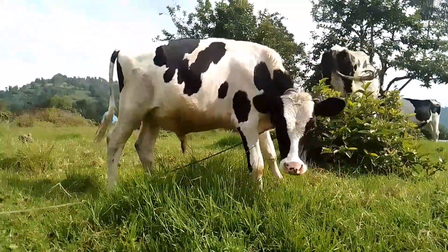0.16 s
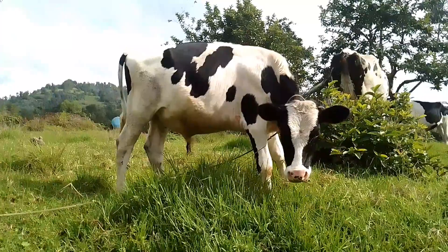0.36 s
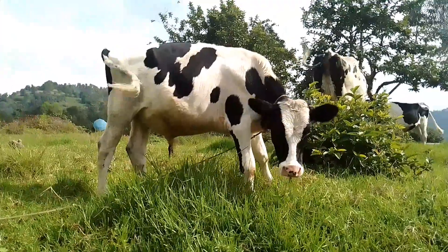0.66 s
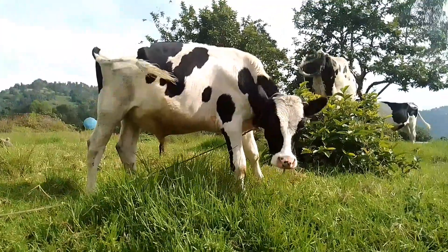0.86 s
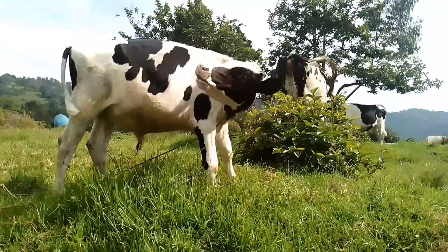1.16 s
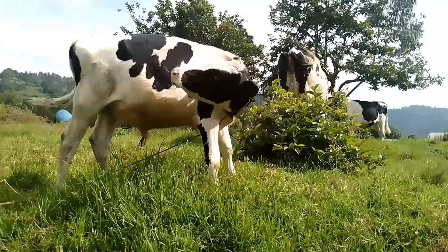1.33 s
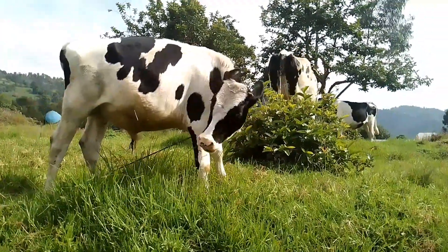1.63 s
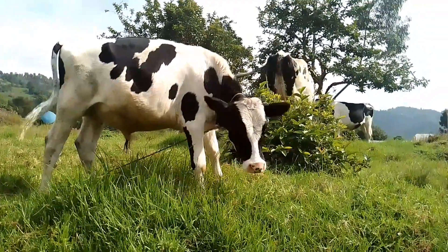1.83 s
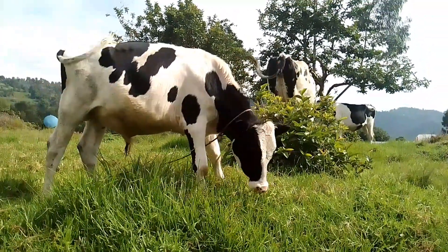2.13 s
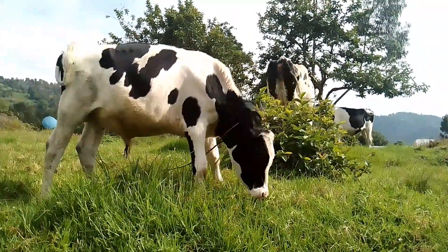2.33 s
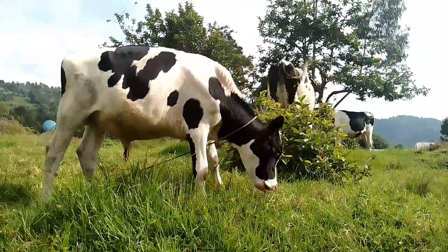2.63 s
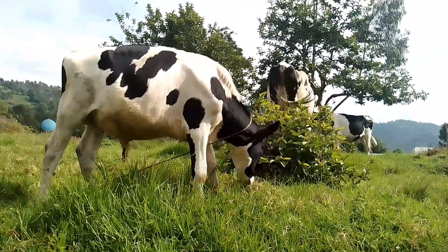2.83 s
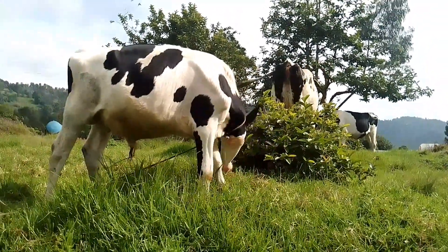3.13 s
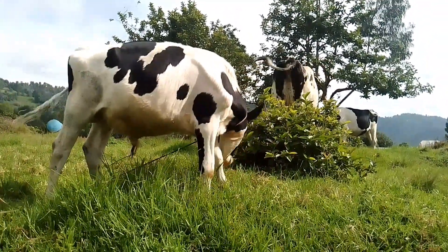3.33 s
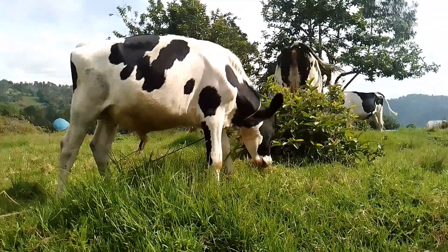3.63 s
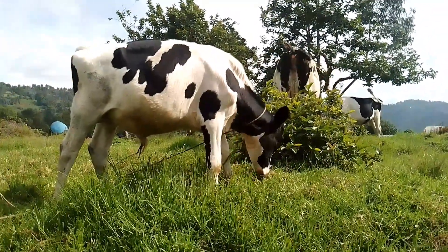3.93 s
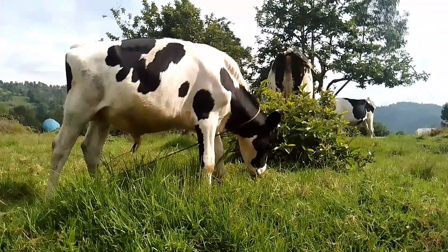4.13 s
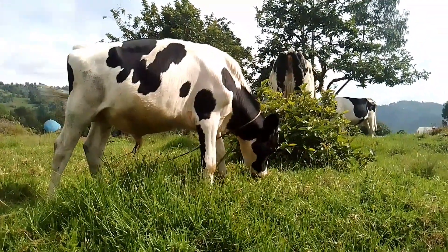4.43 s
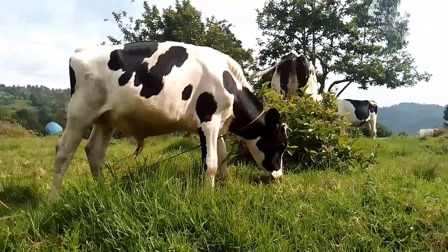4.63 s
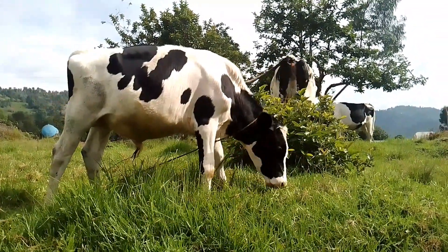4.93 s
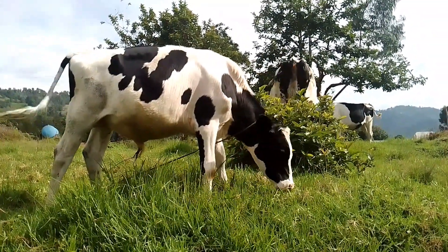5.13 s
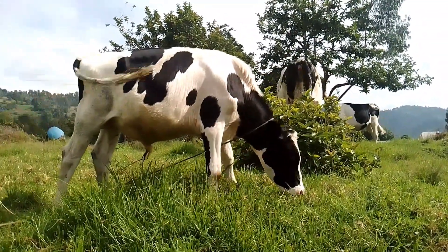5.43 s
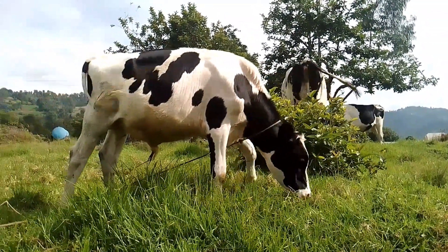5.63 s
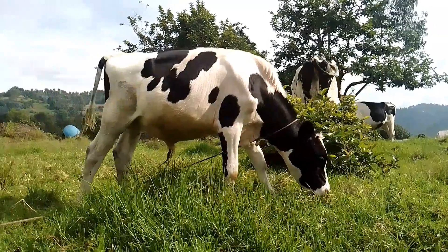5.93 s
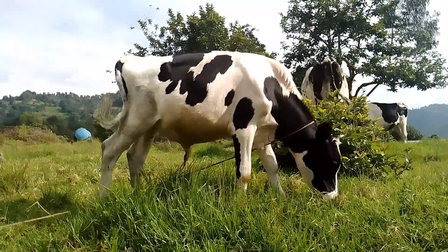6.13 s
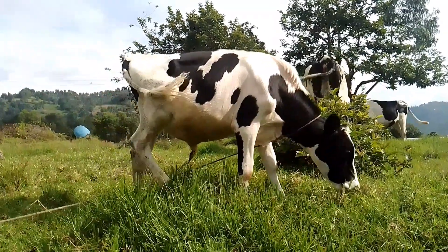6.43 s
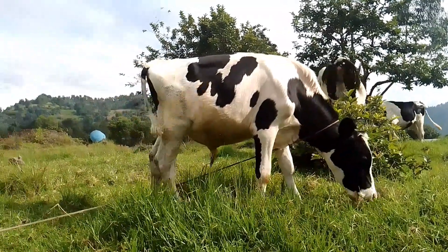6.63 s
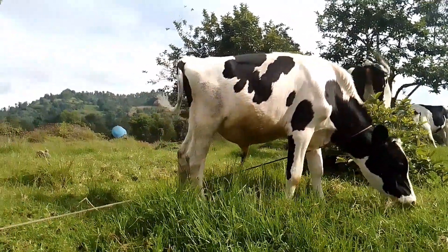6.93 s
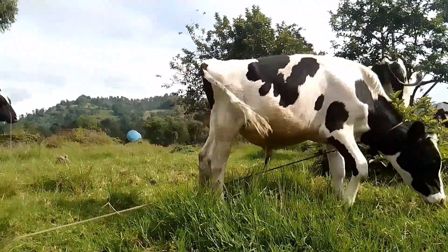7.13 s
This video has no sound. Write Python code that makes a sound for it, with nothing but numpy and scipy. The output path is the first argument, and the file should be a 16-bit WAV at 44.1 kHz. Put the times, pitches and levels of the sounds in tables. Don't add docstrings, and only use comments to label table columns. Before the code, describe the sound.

Close grass tearing and crisp snapping from a grazing cow, soft turf thuds, and high pulsed bird trills in a quiet open pasture.

```python
import sys
import numpy as np
from scipy import signal
from scipy.io import wavfile
from scipy.ndimage import uniform_filter1d

SR = 44100
rng = np.random.default_rng(int(sys.argv[2]) if len(sys.argv) > 2 else 0)


def voltage_ratio(level):
    return 10 ** (np.asarray(level, float) / 20)


def generate_wav(signal):
    frames = np.transpose(np.atleast_2d(signal))
    scaled = np.clip(frames, -1, 1) * 32767
    pcm = np.round(scaled).astype(np.int16)
    wavfile.write(sys.argv[1], SR, pcm)


N = 320166

# (centre [Hz], width [Hz], level [dB])
BRIGHT = [(6900, 2630, 6.5), (8760, 1770, 10), (9360, 230, 1.5)]
# (centre [Hz], width [Hz], level [dB])
DULL = [(3200, 1440, 0.5), (1060, 400, -2)]


def rms_one(x):
    return x / np.sqrt(np.mean(x ** 2) + 1e-20)


def in_time(rows):
    s, *columns = np.transpose(rows)
    return [np.interp(np.arange(N) / SR, s, column) for column in columns]


def add(out, s, piece):
    i = max(round(s * SR), 0)
    out[i:i + len(piece)] += piece[:N - i]


def above(x, hz, order):
    return signal.sosfilt(signal.butter(order, hz, "high", fs=SR, output="sos"), x)


def tone(pitch_hz):
    return np.sin(2 * np.pi * np.cumsum(pitch_hz) / SR)


def progress(length_s):
    return np.arange(round(length_s * SR)) / (length_s * SR)


def drift(rate_hz):
    r = np.exp(-80 * np.pi * rate_hz / SR)
    slow = signal.lfilter([1], [1, -2 * r, r * r], rng.standard_normal(N // 40 + 2002))
    slow = rms_one(slow[2000:])
    return np.interp(np.arange(N) / 40, np.arange(len(slow)), slow)


def resonate(x, modes):
    out = 0
    for k, (hz, width_hz, db) in enumerate(modes):
        r = np.exp(-np.pi * width_hz / SR)
        b = (1 - r * r) / 2 * np.array([1, 0, -1])
        a = [1, -2 * r * np.cos(2 * np.pi * hz / SR), r * r]
        out = out + (-1) ** k * voltage_ratio(db) * signal.lfilter(b, a, x)
    return out


def swells(rows, rest_db):
    lean = 0.64
    power = np.full(N, voltage_ratio(2 * rest_db))
    coarse_s = np.arange(N // 64 + 2) * 64 / SR
    for s, length, db in rows:
        w = np.clip((coarse_s - s) / length, 0, 1)
        power += voltage_ratio(2 * db) * np.repeat(np.sin(np.pi * w ** lean) ** 2, 64)[:N]
    return 10 * np.log10(power)


def grains(per_s, spread_db, clumps):
    born = rng.random(N) < per_s * clumps / SR
    size = voltage_ratio(spread_db * np.minimum(rng.exponential(1, N), 5))
    return born * size * rng.choice([-1, 1], N) + 1e-18


def splinters(count, spread_ms, share, rise_ms=0.):
    t_ms = np.arange(count) / SR * 1000
    present = rng.random(count) < .3
    burst = share * rng.standard_normal(count) * present * np.exp(-t_ms / max(spread_ms, .1))
    if rise_ms > 0:
        return 2 * burst * (1 - np.exp(-(t_ms / rise_ms) ** 2))
    burst[0] = 1
    return burst


def scatter(x, t60):
    t = np.arange(round(.25 * SR)) / SR
    echoes = rng.standard_normal(len(t)) * voltage_ratio(-60 * t / t60) * (t > .002)
    return signal.fftconvolve(x, echoes / np.sqrt(np.sum(echoes ** 2)))[:N]


def banded_noise(spectrum, patchy_db):
    out = 0
    edges = 25 * 2 ** np.arange(0, 9.6, 1 / 4)
    white = rng.standard_normal((2, N))
    hz_at, db_at = np.transpose(spectrum)
    for k, (low, high) in enumerate(zip(edges, edges[1:])):
        band = signal.sosfilt(signal.butter(2, [low, high], "band", fs=SR, output="sos"), white[k % 2])
        flicker_db = patchy_db * drift(17.4) / (1 + low / 5000)
        band_db = np.interp(np.log(low * high) / 2, np.log(hz_at), db_at)
        out = out + band * voltage_ratio(band_db + flicker_db)
    return rms_one(out)


def open_air():
    # (frequency [Hz], density [dB per Hz])
    air_colour = [(18, -48), (30, -25), (97, -10.5), (316, -2.5), (1050, -8.5), (1270, -8.5), (2190, -11),
                  (3000, -6), (4560, -25), (4930, -27.5), (6080, 5), (7300, -3), (9740, -3.5), (11400, -44),
                  (15600, -8.5)]
    return voltage_ratio(-62.5) * banded_noise(air_colour, patchy_db=4.0)


def insects(level_db, hz, width_hz):
    edge = signal.butter(2, width_hz, fs=SR, output="sos")
    a, b = signal.sosfilt(edge, rng.standard_normal((2, N)))
    phase = 2 * np.pi * np.cumsum(hz) / SR
    return voltage_ratio(level_db - 1.0) * rms_one(a * np.cos(phase) + b * np.sin(phase))


def insect_chorus():
    # (time [s], level [dB], pitch [Hz])
    broad = [
        (0.0, -56.5, 9510),
        (2.22, -59.5, 9970),
        (2.51, -57.5, 9830),
        (3.28, -61, 9770),
        (3.92, -57.5, 9710),
        (5.26, -59.5, 9840),
        (6.73, -53, 9830),
        (7.26, -59, 9800),
    ]
    # (time [s], level [dB], pitch [Hz])
    thin = [(0, -67, 10400), (.9, -65, 10000), (1.15, -74, 10800), (1.75, -70, 11000), (2.1, -92, 10100),
            (2.6, -77, 10200), (3.0, -71, 10900), (3.45, -71, 10900), (3.7, -69, 10300), (5.0, -69, 10380),
            (7.26, -70, 10550)]
    return insects(*in_time(broad), width_hz=420) + insects(*in_time(thin), width_hz=64)


def rustle(dry_db, top_db, tear_db):
    clumps = voltage_ratio(4.0 * drift(18))
    fine = rms_one(grains(2500, spread_db=1.0, clumps=clumps)) + 0.41 * rng.standard_normal(N)
    coarse = rms_one(grains(500, spread_db=1.5, clumps=clumps)) + 1.43 * rng.standard_normal(N)
    top = above(fine, 11000, order=3)
    bright = above(resonate(fine, BRIGHT), 5800, order=3)
    dull = resonate(resonate(coarse, DULL), [(2680, 16300, 0)])
    out = voltage_ratio(dry_db + 2.0) * rms_one(bright)
    out += voltage_ratio(top_db + 11.5) * rms_one(top)
    return out + voltage_ratio(tear_db + 5.0) * rms_one(dull)


def grazing():
    # (start [s], length [s], dry rustle [dB], juicy tearing re rustle [dB])
    tugs = [(-.3, 0.8, -53, -6.5), (0.31, 0.66, -70.5, -2), (0.743, 0.21, -66, -3), (1.013, 0.12, -56, -12),
            (1.15, 0.6, -63.5, -5), (1.648, 0.14, -58.5, -11.5), (1.856, 0.06, -68, -22),
            (2.44, 0.22, -61, -20), (2.914, 0.44, -60, -11), (3.44, 0.26, -59.5, -27),
            (3.832, 0.42, -59, -13.5), (4.148, 0.43, -67.5, -0.5), (4.494, 0.58, -56.5, -16.5),
            (4.623, 0.13, -56, -10), (5.273, 0.87, -59, -13), (5.732, 0.5, -50.5, -18.5),
            (6.185, 0.34, -58, -11.5), (6.335, 0.25, -51, -16.5), (6.515, 0.57, -51.5, -12),
            (6.946, 0.97, -55, -15.5), (7.014, 0.11, -50, -17)]
    # (start [s], length [s], fizz [dB])
    swishes = [
        (-.12, 0.45, -65),
        (4.64, 0.091, -59.5),
    ]
    rest_db, juicy_rest_db, fizz_rel_db = -63, -74.5, -18.5
    dry_db = swells([row[:3] for row in tugs], rest_db)
    fizz_rows = [(s, length, db + fizz_rel_db) for s, length, db, _ in tugs]
    fizz_db = swells(fizz_rows + swishes, rest_db + fizz_rel_db)
    juicy_db = swells([(s, length, db + rel_db) for s, length, db, rel_db in tugs], juicy_rest_db)
    return rustle(dry_db, fizz_db, juicy_db)


def chewing(body_db):
    clicks = grains(120, spread_db=0.5, clumps=voltage_ratio(7.6 * drift(9.7)))
    dealt = rng.integers(0, 8, N)
    rings = 0
    for k, hz in enumerate(np.geomspace(600, 2600, 8)):
        rings = rings + resonate(clicks * (dealt == k) + 1e-18, [(hz, 0.53 * hz, 0)])
    return voltage_ratio(body_db - 9.5) * rms_one(rings)


def body():
    # (start [s], length [s], level [dB])
    shifts = [
        (-.15, 0.88, -64),
        (1.25, 0.31, -64),
        (1.53, 0.36, -65.5),
        (2.98, 0.42, -66),
        (3.88, 0.15, -64),
        (4.64, 0.31, -65),
        (5.03, 0.19, -67.5),
        (5.45, 0.15, -63),
        (6.13, 0.42, -67),
        (7.04, 0.054, -71),
    ]
    # (frequency [Hz], density [dB per Hz])
    turf_colour = [(40, -20), (100, -10), (250, -3), (500, -5), (1000, -11), (2000, -12), (3000, -38)]
    body_db = swells(shifts, rest_db=-68)
    return voltage_ratio(body_db - 2.0) * banded_noise(turf_colour, patchy_db=2.5) + chewing(body_db)


def cracks(rows, length_ms, width, lag_s=0.00088, rise_ms=0.):
    # (frequency [share of its pitch], level [dB])
    mouth = [(1.012, 10), (1.4, -5.5), (0.87, 1)]
    out = np.zeros(N)
    for s, db, hz in rows:
        spread_ms = length_ms * (3300 / hz) ** .7
        burst = splinters(count=1500, spread_ms=spread_ms, share=0.92, rise_ms=rise_ms)
        ring = resonate(burst, [(share * hz, width * hz, rel_db) for share, rel_db in mouth])
        add(out, s + lag_s, voltage_ratio(db - 3.0) * ring / np.max(np.abs(ring)))
    return out


def mouth_and_turf():
    # (time [s], peak [dB], pitch [Hz])
    wet = [(0.062, -52, 3970), (0.134, -44.5, 960), (0.258, -38, 2740), (0.752, -43.5, 1240),
           (0.752, -49, 2400), (2.258, -50, 2000), (3.183, -49, 3250), (3.183, -50, 1790),
           (1.002, -41, 3350), (1.586, -39, 3020), (2.475, -44, 2730), (3.754, -51, 1870),
           (3.813, -46, 1760), (4.003, -46, 3350), (4.465, -46.5, 1610), (4.479, -43, 2770),
           (4.67, -38.5, 3250), (5.056, -46.5, 1900), (5.075, -45.5, 3160), (5.833, -36.5, 3650),
           (6.368, -36.5, 3560), (6.423, -44, 3630), (6.45, -34, 3000), (6.451, -59, 610),
           (7.041, -38, 3170), (7.074, -40, 2570), (7.0735, -41.5, 1290), (7.071, -46, 3600)]
    # (time [s], peak [dB], pitch [Hz])
    smacks = [(0.064, -46, 4000), (0.075, -49, 3610), (0.097, -53, 3700), (0.124, -56, 970),
              (0.167, -37, 3500), (0.199, -48, 3390), (0.372, -49, 2380), (0.518, -50, 3550),
              (0.646, -47.5, 1150), (0.777, -57, 810), (0.815, -53, 620), (0.84, -49, 1290),
              (0.874, -43.5, 3130), (0.979, -57, 3360), (1.056, -45, 3220), (1.166, -52, 3350),
              (1.218, -44, 3100), (2.964, -46, 2980), (3.091, -54, 1230), (3.715, -46, 2870),
              (3.903, -48, 1690), (3.93, -58, 1730), (3.97, -52, 1660), (4.01, -43, 3250),
              (4.189, -51, 743), (4.369, -54, 3070), (4.742, -59, 790), (4.862, -47, 2340),
              (6.086, -48, 3740), (6.717, -47, 3460)]
    # (time [s], peak [dB], pitch [Hz])
    sharp = [(0.4205, -24, 2940), (1.612, -48, 1050), (1.68, -61, 1200), (3.464, -34, 3670),
             (6.4505, -34, 2800), (7.0419, -19, 6900), (3.764, -40, 940), (4.109, -46, 842),
             (4.146, -39, 1000), (5.833, -39.5, 905), (7.074, -29.5, 854)]
    out = cracks(wet, length_ms=5.5, width=0.14, lag_s=-0.00027, rise_ms=1.16)
    out += voltage_ratio(-4.0) * cracks(smacks, length_ms=4.8, width=0.077, lag_s=-0.00026, rise_ms=2.0)
    return out + cracks(sharp, length_ms=.15, width=.9)


def bent_notes(rows, bend, lean):
    out = np.zeros(N)
    for s, length, start_hz, end_hz, db in rows:
        w = progress(length)
        pitch = end_hz + (start_hz - end_hz) * (1 - w) ** bend
        add(out, s, voltage_ratio(db) * np.sin(np.pi * w ** lean) * tone(pitch))
    return out


def far_calls():
    # (start [s], length [s], start pitch [Hz], end pitch [Hz], peak [dB])
    glides = [(3.13, 0.058, 2050, 1760, -68.5), (5.74, 0.13, 1080, 1020, -75), (5.88, 0.18, 995, 914, -72),
              (6.02, 0.093, 796, 620, -71), (.79, 0.13, 1120, 1333, -65.5), (6.3, 0.5, 915, 889, -73),
              (6.72, 0.16, 3050, 2940, -66.5), (2.08, 0.028, 3500, 2780, -68),
              (2.105, 0.035, 2800, 2720, -65.5), (2.67, .05, 2900, 2790, -70),
              (.07, 0.071, 1905, 1870, -58), (.16, .05, 1850, 1860, -63), (2.232, 0.031, 3410, 3250, -61),
              (2.248, 0.028, 3100, 2900, -62), (3.0, 0.017, 2530, 2460, -64),
              (2.88, 0.017, 3240, 3490, -54.5), (2.905, 0.028, 3200, 2870, -63),
              (4.612, 0.058, 3340, 3110, -57), (5.122, 0.03, 3200, 3470, -56.5),
              (5.14, 0.031, 3630, 2890, -62), (5.668, 0.025, 3370, 3250, -54),
              (5.69, 0.065, 2950, 2790, -60.5), (5.74, 0.038, 2880, 2270, -66),
              (6.222, 0.033, 3510, 3200, -57), (6.245, 0.047, 3100, 2310, -65),
              (7.105, 0.039, 3270, 3266, -56), (7.13, 0.126, 1090, 1036, -70),
              (7.135, 0.022, 2860, 2720, -62)]
    return bent_notes(glides, bend=1.755, lean=0.59) * voltage_ratio(5 * drift(120))


def thuds(lag_s=0.00553, noisy=0.15):
    # (time [s], peak [dB], pitch [Hz])
    knocks = [(0.156, -55, 460), (0.252, -55, 634), (0.333, -57, 436), (0.808, -62, 587),
              (0.997, -44.5, 237), (1.56, -49, 230), (1.586, -41, 221), (1.61, -27.5, 324),
              (1.676, -34.5, 320), (1.798, -60, 410), (2.31, -52, 315), (3.168, -53, 302),
              (3.181, -49, 515), (3.216, -59, 227), (4.011, -55, 261), (4.105, -58, 760), (4.689, -52, 350),
              (4.709, -53, 417), (7.08, -59, 110), (4.738, -50, 360), (5.489, -53, 450), (5.508, -65, 256),
              (7.037, -45, 570), (7.076, -48, 504), (6.448, -46, 268), (7.069, -41, 646)]
    out, t = np.zeros(N) + 1e-18, np.arange(round(.06 * SR)) / SR
    for s, db, hz in knocks:
        t60 = 0.015 * np.exp(-0.08 * (db + 46.5))
        rough = 1 + noisy * uniform_filter1d(rng.standard_normal(len(t)), size=12)
        onset = 1 - np.exp(-t / 0.00038)
        swing = np.cos(2 * np.pi * hz * t) * voltage_ratio(-60 * t / max(t60, .003)) * onset
        add(out, s + lag_s, voltage_ratio(db + 6.5) * swing * rough)
    return above(out, 90, order=2)


def snaps(lag_s=0.001):
    # (time [s], peak [dB], dull part re peak [dB])
    stems = [(0.1611, -24.5, -18), (0.2893, -33, -29), (0.4217, -44, -21), (1.002, -41, -4),
             (2.37, -38, -5), (3.3832, -46, -21), (3.4648, -30, -33), (4.1456, -40, -18),
             (4.3514, -42, -23), (4.6493, -34, -11), (4.666, -40, -5), (4.669, -35, -10),
             (4.6775, -34, -17), (4.681, -31.5, -15), (4.6887, -35, -25), (4.692, -34, -22),
             (4.776, -38, -20), (5.4984, -38, -12), (5.833, -23, -27), (5.8488, -34, -8),
             (5.8365, -40, -20), (5.8705, -39, -20), (5.8747, -33, -27), (7.0365, -34, -3),
             (6.0852, -29, -11.5), (6.3663, -29.5, -7.5), (6.37, -34, -20), (6.4445, -44, -20),
             (6.378, -25, -32), (6.388, -32, -11), (6.3992, -34, -7), (6.403, -35, -5), (6.407, -30, -12),
             (6.412, -35, -6), (6.4217, -33, -11), (6.451, -31, -10), (6.824, -32, -19), (7.03, -28, -18),
             (7.0397, -25, -7), (7.0686, -32.5, -9), (7.071, -32, -12), (7.0743, -32, -4)]
    # (time [s], peak [dB], dull part re peak [dB])
    hardest = (7.0419, -21.5, -14)
    bright, dull = np.zeros(N) + 1e-18, np.zeros(N) + 1e-18
    for s, db, dull_db in stems + [hardest]:
        burst = splinters(count=500, spread_ms=1.2, share=0.52)
        burst = 1.56 * rms_one(burst) / np.sqrt(len(burst))
        add(bright, s + lag_s, voltage_ratio(db) * burst)
        add(dull, s + lag_s, voltage_ratio(db + dull_db) * burst)
    top = .21 * above(bright, 11000, order=2)
    ringing = voltage_ratio(11.0) * above(resonate(bright, BRIGHT), 5600, order=3)
    return ringing + top + voltage_ratio(12.5) * resonate(dull, DULL)


def chips():
    # (start [s], length [s], start pitch [Hz], end pitch [Hz], peak [dB])
    notes = [(.2335, 0.014, 4760, 6900, -44.5), (0.2405, 0.02, 3970, 6350, -44.5),
             (0.2565, 0.01, 3670, 6520, -39.5), (0.2675, 0.006, 6400, 6020, -41),
             (0.2735, 0.013, 6400, 6050, -48), (.2865, 0.0074, 6100, 7800, -54),
             (0.294, 0.014, 5420, 6270, -42.5), (.319, 0.0064, 5000, 6230, -53),
             (6.705, .022, 5200, 4900, -61), (.308, 0.0084, 4770, 6560, -44),
             (1.853, 0.028, 5950, 6000, -44), (1.869, 0.01, 6140, 6770, -41),
             (3.389, 0.008, 6900, 6460, -51.5), (4.662, 0.012, 6420, 6980, -39),
             (4.672, 0.018, 4560, 6790, -39), (4.686, 0.0141, 4520, 6330, -36),
             (4.73, 0.013, 6100, 6420, -47), (5.659, 0.012, 8230, 8130, -38),
             (5.669, 0.02, 8340, 7430, -39), (5.680, 0.0087, 6500, 6150, -40.5),
             (5.688, .016, 7360, 7200, -51), (5.898, 0.016, 5640, 5680, -49.5),
             (1.238, 0.012, 6770, 6100, -66)]
    return bent_notes(notes, bend=2.52, lean=1.17)


def ticks():
    # (time [s], peak [dB])
    blades = [(0.3676, -46), (0.4044, -52), (0.4469, -52), (0.5734, -60), (0.7809, -53), (1.3448, -53),
              (1.6769, -53), (1.7923, -49), (2.0732, -53), (2.4758, -49), (2.5194, -51), (2.9632, -49),
              (3.1128, -47), (3.5194, -55), (3.6666, -46), (3.6794, -50), (4.144, -48), (4.5725, -51),
              (4.583, -42), (4.6386, -36), (5.473, -43), (5.7917, -51), (5.814, -38), (6.109, -51),
              (6.1789, -53), (6.553, -43), (6.7337, -36), (6.8265, -40), (6.8384, -44)]
    # (time [s], peak [dB])
    high_flecks = [(0.4469, -56), (0.4788, -53), (0.5008, -49), (2.5072, -57), (2.5591, -58), (2.5744, -60),
                   (2.6794, -63), (3.7579, -56), (3.7858, -58), (3.8112, -60), (3.8112, -56), (4.1454, -54)]
    fleck_hz, fleck_width_hz = 14800, 700
    dry, flecks = np.zeros(N) + 1e-18, np.zeros(N) + 1e-18
    for s, db in blades:
        add(dry, s - .002, voltage_ratio(db + 7.5) * splinters(count=400, spread_ms=3.5, share=0.87, rise_ms=2.5))
    for s, db in high_flecks:
        add(flecks, s, voltage_ratio(db + 18.0) * splinters(count=800, spread_ms=5.0, share=.9))
    flecks = resonate(flecks, [(fleck_hz, fleck_width_hz, 0)])
    return above(dry, 8000, order=2) + resonate(flecks, [(fleck_hz, 3 * fleck_width_hz, 0)])


def sung(rows, manner):
    fall, swell_db, climb, lean, slowing = manner
    return [(first, last, hz, fall, db - swell_db, db, climb, lean, slowing) for first, last, hz, db in rows]


def trills(rows, pulses, uneven_db=.7):
    # (time [s], half length [s], change [dB])
    turns = [
        (0.78, .03, 2),
        (.805, 0.013, -5),
        (3.249, 0.0032, -25),
        (5.011, 0.0054, 1),
        (4.27, .02, 0.5),
        (3.24, .02, 1),
    ]
    opening, overshoot, droop = 4.2, 1.7, 0.072
    throat_gain_db, throat_half_width = 1.54, .085
    out = np.zeros(N)
    for (first, last, hz, fall, first_db, last_db, climb, lean, slowing), count in zip(rows, pulses):
        chance = rng.standard_normal((count + 1, 3))
        for k, (late, sharp, loud) in enumerate(chance):
            u, short = k / count, k % 2
            s = first + (last - first) * (u - slowing * u * (1 - u)) + 0.00016 * late
            duty = max(.56 - .45 * fall, .4)
            stretch = 0.98 + 0.5 * u + 3.0 * fall ** 2 * u * (-1) ** k
            length = duty * (last - first) / count * stretch
            w = progress(length)

            early_sag = climb * (1 - u) ** 4.1
            depth = fall * (1 - opening * (fall - .11) * (1 - u) ** 2)
            shape = .35 - w ** 1.15 + overshoot * fall * short * (1 - w) ** 3
            pitch = hz * (1 - early_sag + depth * shape - droop * w ** 3) + 40 * sharp

            favoured = 1 - early_sag - fall ** 2 * short * u
            throat = voltage_ratio(throat_gain_db) / (1 + ((pitch / hz - favoured) / throat_half_width) ** 2)

            db = last_db + (first_db - last_db) * (1 - u) ** 0.88
            db += uneven_db * loud - 40 * fall * (1 - u) ** 5.2
            db += sum(turn_db * np.exp(-((s - at) / half) ** 2) for at, half, turn_db in turns)
            add(out, s - length / 2, voltage_ratio(db) * throat * np.sin(np.pi * w ** lean) * tone(pitch))
    return out


def near_trills(manners):
    # (first pulse [s], last pulse [s], pitch [Hz], last level [dB])
    first_bird = [
        (0.4315, 0.5, 5840, -44),
        (0.6995, 0.829, 5920, -42.5),
        (1.0245, 1.1705, 5980, -39.5),
        (1.3665, 1.5298, 6000, -38.5),
        (1.7583, 1.932, 5950, -37.5),
    ]
    # (first pulse [s], last pulse [s], pitch [Hz], last level [dB])
    second_bird = [
        (2.845, 2.933, 5930, -43),
        (3.165, 3.294, 5950, -41.5),
        (3.493, 3.627, 5970, -41),
        (3.823, 3.953, 5950, -41),
        (4.167, 4.306, 6000, -39),
        (4.522, 4.655, 6020, -38.5),
        (4.891, 5.0204, 6050, -38.5),
    ]
    # (first pulse [s], last pulse [s], pitch [Hz], last level [dB])
    flourish = [
        (5.0236, 5.0805, 6520, -47),
    ]
    # (first pulse [s], last pulse [s], pitch [Hz], last level [dB])
    third_bird = [
        (5.311, 5.437, 6420, -46.5),
        (5.654, 5.789, 6510, -46),
        (5.991, 6.146, 6470, -48.5),
    ]
    pulses = [10, 19, 21, 23, 24, 12, 18, 19, 18, 19, 18, 17, 8, 18, 20, 22]
    songs = []
    for rows, manner in zip([first_bird, second_bird, flourish, third_bird], manners):
        songs += sung(rows, manner)
    return trills(songs, pulses)


def far_trills(lead_manner):
    # (first pulse [s], last pulse [s], pitch [Hz], last level [dB])
    lead_in = [
        (1.31, 1.364, 6240, -66),
        (4.315, 4.395, 6800, -64),
    ]
    # (first pulse [s], last pulse [s], pitch [Hz], last level [dB])
    far_bird = [
        (.855, .985, 5830, -67),
        (2.0068, 2.1298, 6020, -63.5),
        (2.7097, 2.824, 5600, -67),
        (3.302, 3.37, 5800, -66),
        (3.9741, 4.0539, 5560, -65),
        (4.3313, 4.4526, 5640, -63),
    ]
    # fall [share of pitch], swell [dB], early climb [share of pitch], lean [-], slowing [-]
    far_manner = (0.14, 0, 0.076, 0.32, 0.34)
    far_pulses = [8, 11, 18, 16, 15, 8, 10, 15]
    return trills(sung(lead_in, lead_manner) + sung(far_bird, far_manner), far_pulses)


def seeps(flutter_db=1.0):
    # (time [s], pitch [Hz], level [dB])
    low_voice = [
        (1.868, 6872, -68),
        (1.89, 6870, -58),
        (1.955, 6880, -53),
        (1.99, 6870, -71),
        (2.13, 6880, -70),
        (2.3, 6860, -88),
    ]
    # (time [s], pitch [Hz], level [dB])
    high_voice = [
        (1.875, 7060, -56),
        (1.905, 7160, -49.5),
        (1.96, 6960, -53),
        (2.02, 7080, -72),
        (2.24, 7080, -83),
    ]
    out, flutter = np.zeros(N), voltage_ratio(flutter_db * drift(40))
    for rows in low_voice, high_voice:
        s, hz, db = np.transpose(rows)
        t = np.arange(s[0], s[-1], 1 / SR)
        fade = np.clip(np.minimum(t - s[0], s[-1] - t) / 0.0013, 0, 1)
        level = np.sqrt(2) * fade * voltage_ratio(np.interp(t, s, db))
        add(out, s[0], level * tone(np.interp(t, s, hz)))
    return out * flutter


def peeps(bend=5.5, lean=0.5):
    # (start [s], length [s], lowest pitch [Hz], peak [dB], final upturn [Hz])
    hooked = [
        (6.043, 0.04, 5230, -55.5, 310),
        (6.162, .03, 5220, -66, 120),
        (6.301, 0.069, 5220, -56, 60),
        (6.567, 0.059, 5370, -56, 10),
        (6.872, 0.046, 5240, -54.5, 17),
        (7.146, 0.055, 5200, -58, 130),
    ]
    out = np.zeros(N)
    for s, length, hz, db, upturn_hz in hooked:
        w = progress(length)
        pitch = hz + 380 * (1 - w) ** bend + upturn_hz * w ** 2
        add(out, s, voltage_ratio(db) * np.sin(np.pi * w ** lean) ** 0.78 * tone(pitch))
    return out


def birds():
    # (fall in a pulse [share of pitch], swell through the trill [dB],
    # early climb [share of pitch], lean of a pulse [-, under 1 = loud early], slowing of the pulses [-])
    manners = [
        (.26, 1, -0.011, 0.83, .075),
        (0.16, 3.5, 0.046, 0.38, .03),
        (0.15, -3, 0.0099, 1, 0.014),
        (0.089, 1, -0.0062, 1.4, 0.072),
    ]
    near = above(near_trills(manners) + seeps(), 5050, order=8)
    middle = chips() + peeps()
    calls = far_calls()
    far = far_trills(manners[3])
    out = near + middle + scatter(voltage_ratio(-13.5) * near + voltage_ratio(-3.5) * middle, t60=0.19)
    out += 3.0 * far + scatter(far, t60=0.13)
    return out + 0.5 * calls + 0.81 * scatter(calls, t60=0.21)


def cow_at_microphone():
    cow = grazing() + body() + mouth_and_turf() + thuds() + snaps() + ticks()
    cow -= 0.36 * resonate(cow, [(5060, 2200, 0)])
    cow -= 0.32 * resonate(cow, [(2146, 710, 0)])
    return cow


def scene():
    mono = cow_at_microphone() + birds() + insect_chorus() + open_air()
    return np.array([mono, mono])


def band_limit(x):
    return signal.sosfilt(signal.butter(12, 16440, fs=SR, output="sos"), x)


def record(dry):
    cut = signal.sosfilt(signal.ellip(12, .5, 50, 15580, fs=SR, output="sos"), dry)
    return band_limit(cut)


dry = scene()
out = record(dry)
generate_wav(out)
```